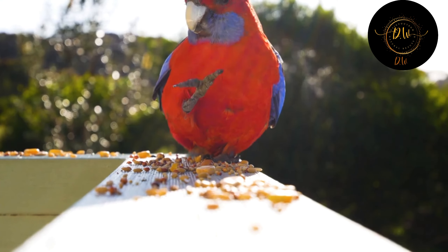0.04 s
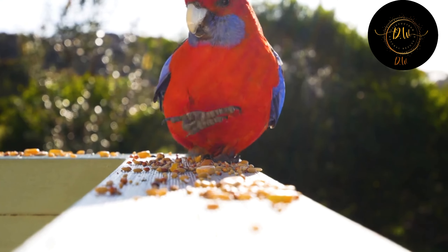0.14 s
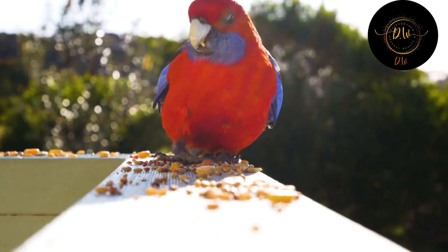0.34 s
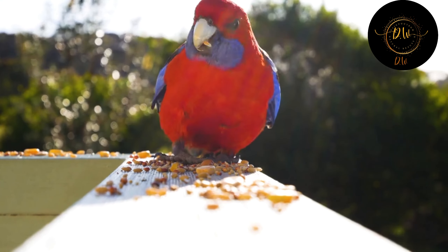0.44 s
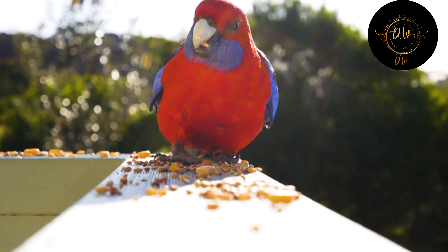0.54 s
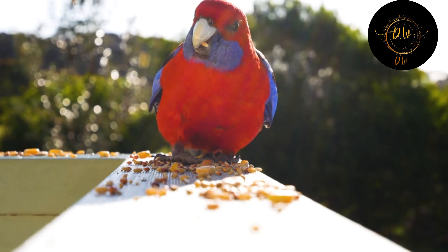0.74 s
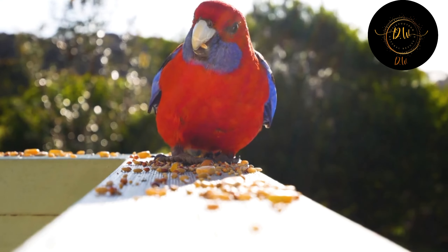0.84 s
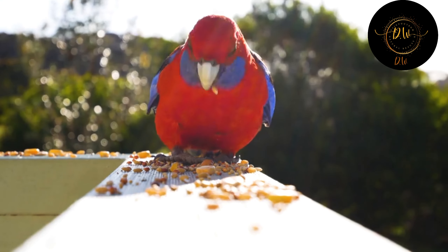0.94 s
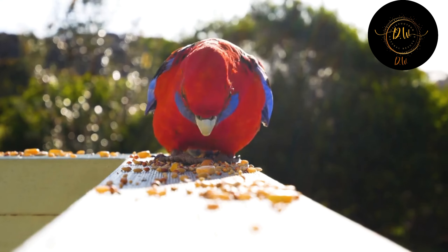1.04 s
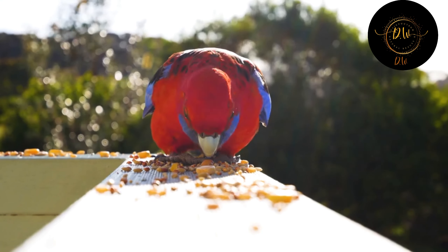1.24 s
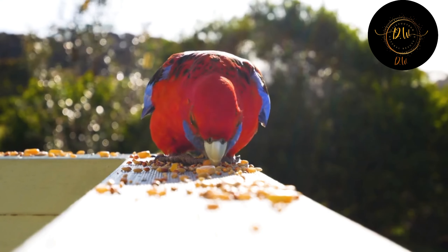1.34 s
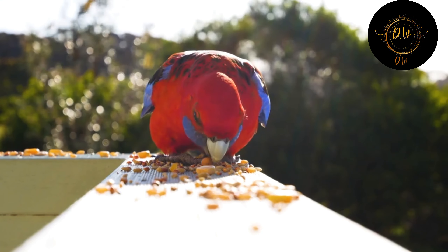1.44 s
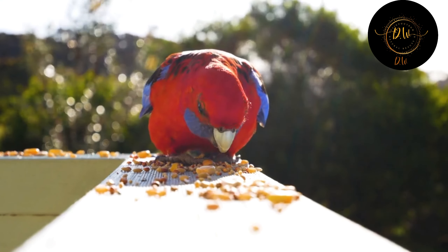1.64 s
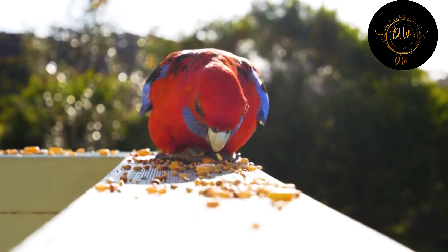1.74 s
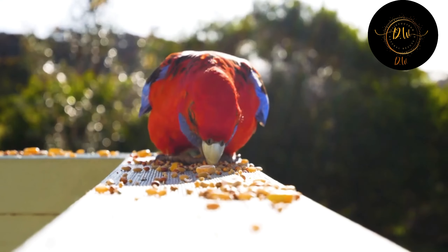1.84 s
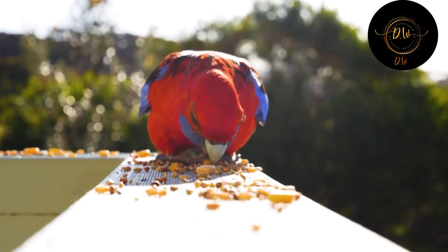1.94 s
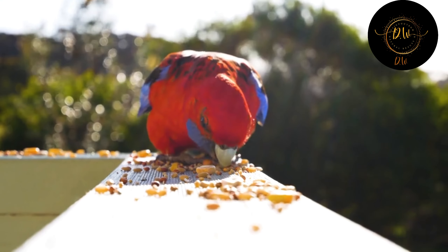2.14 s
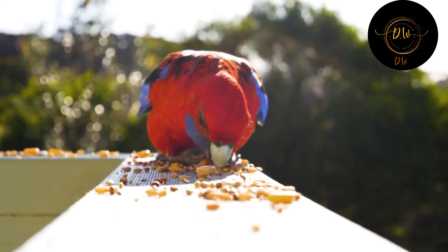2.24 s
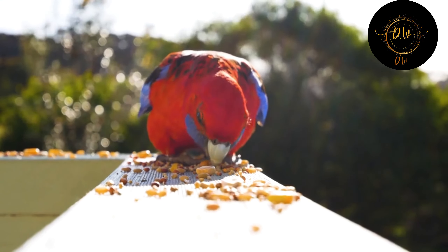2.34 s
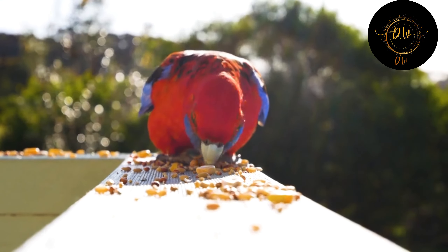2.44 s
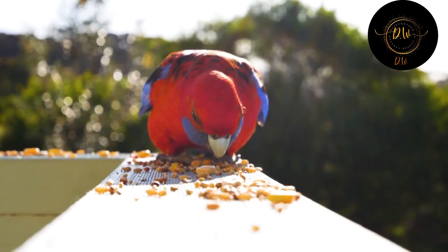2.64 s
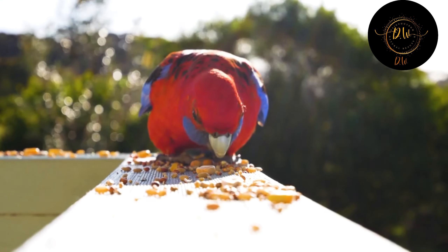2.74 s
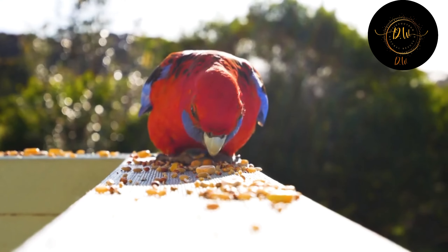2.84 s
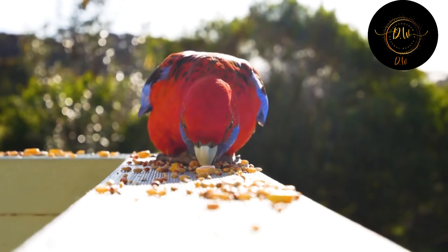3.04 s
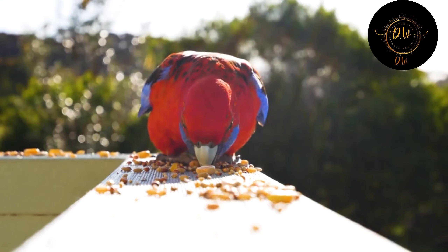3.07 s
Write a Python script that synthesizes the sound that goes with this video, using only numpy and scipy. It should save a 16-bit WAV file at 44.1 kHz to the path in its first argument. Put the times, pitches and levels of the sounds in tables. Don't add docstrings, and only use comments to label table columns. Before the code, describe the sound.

Close to the microphone, a parrot's beak drags and pecks through grain on a thin wooden rail. A strong scrape opens, near quiet follows, then irregular clusters of dry snaps, bright ticks and gritty crackle, with short pauses between bouts. The hardest cracks come near the end. Faint steady hiss and barely audible hum lie beneath; outdoors, dry, no echo.

```python
import sys
import numpy as np
from scipy import signal
from scipy.fft import rfft, irfft
from scipy.io import wavfile
from scipy.ndimage import uniform_filter1d

SR = 44100
rng = np.random.default_rng(int(sys.argv[2]) if len(sys.argv) > 2 else 0)


def level_to_linear(level):
    exponent = np.asarray(level, float) / 20
    return 10 ** exponent


def materialize(psi):
    bounded = np.clip(np.atleast_2d(psi).T, -1, 1)
    quanta = np.round(bounded * 32767).astype(np.int16)
    wavfile.write(sys.argv[1], SR, quanta)


N = 276948
TOP_HZ = 13900


def unit(x):
    return x / np.sqrt(np.mean(x ** 2))


def colour(x, points):
    hz, db = np.transpose(points)
    bin_hz = np.arange(1, 1026) * SR / 2050
    log_gain = np.log(level_to_linear(np.interp(np.log(bin_hz), np.log(hz), np.maximum(db, -50))))
    cepstrum = irfft(log_gain)
    cepstrum[1:1024] *= 2
    cepstrum[1025:] = 0
    return signal.fftconvolve(x, irfft(np.exp(rfft(cepstrum))))[:N]


def follow(points):
    return level_to_linear(np.interp(np.arange(N) / SR, *np.transpose(points)))


def swell(t, rise_s):
    return t / rise_s * np.exp(1 - t / rise_s)


def ring(x, modes):
    out = 0
    for k, (hz, db, t60_s) in enumerate(modes):
        pole = np.exp(2j * np.pi * hz / SR - np.log(1000) / (max(t60_s, .002) * SR))
        level = (-1) ** k * level_to_linear(db) * np.sqrt(1 - abs(pole))
        out = out + level * signal.lfilter([1], [1, -pole], x).imag
    return out


def slips(rate_hz, scatter_db, longest_db):
    when, size, sign = rng.random((3, N))
    height_db = np.minimum(-scatter_db * np.log(1 - size), longest_db)
    return unit((when < rate_hz / SR) * level_to_linear(height_db) * np.sign(sign - .5))


# freq [Hz], level [dB]
HUM = [(120, -70), (240, -76)]
# freq [Hz], density [dB per Hz]
HISS = [(100, -43), (200, -9.5), (300, -10), (480, -3.5), (2000, -9), (13500, -16.5), (14500, -37)]


def garden():
    t = np.arange(N) / SR
    hum = sum(level_to_linear(db) * np.sqrt(2) * np.sin(2 * np.pi * hz * t) for hz, db in HUM)
    low_pass = signal.butter(2, 65., fs=SR, output="sos")
    rumble = level_to_linear(-81) * unit(signal.sosfilt(low_pass, rng.standard_normal(N)))
    hiss = level_to_linear(-50.5) * unit(colour(rng.standard_normal(N), HISS))
    return hiss + rumble + hum


def ticks(rows, half_s, spread, gain_db):
    t = np.arange(-200, 200) / SR
    out = np.zeros(N + 400)
    shape = np.exp(-.5 * (t / half_s) ** 2)
    for (start_s, level_db, pitch_hz), chance in zip(rows, rng.standard_normal((len(rows), 2, 8))):
        partials_hz = np.minimum(pitch_hz * np.exp(spread * chance[0]), TOP_HZ)
        phase = np.pi * chance[1][:, None]
        burst = shape * np.sin(2 * np.pi * np.outer(partials_hz, t) + phase).sum(axis=0)
        burst *= np.linalg.norm(shape) / np.linalg.norm(burst) / np.sqrt(2)
        i = int(start_s * SR)
        out[i:i + 400] += level_to_linear(level_db + gain_db) * burst
    return out[200:N + 200]


# peak_s [s], level_db [dB], pitch_hz [Hz]
CHIPS = [(0.0451, -25, 10150), (0.0603, -19, 9050), (0.0664, -25, 8540), (0.0746, -22, 11400),
         (0.0805, -15, 8400), (0.0941, -34, 8690), (0.119, -24.5, 11040), (0.5726, -41, 9260),
         (0.6569, -35, 9900), (0.7735, -30, 9000), (1.1211, -35, 8820), (1.1286, -24.5, 9700),
         (1.1356, -25, 10240), (1.1497, -25.5, 9900), (1.2655, -31, 7450), (1.2982, -26, 9910),
         (1.3367, -25.5, 9700), (1.4288, -30.5, 9360), (1.4717, -33, 10470), (1.5603, -29, 7910),
         (1.5735, -28, 10680), (1.5868, -23, 10630), (1.5925, -20, 10100), (1.6261, -36, 10460),
         (1.6417, -31, 9100), (1.6508, -26, 7900), (1.6803, -37, 8030), (1.7181, -27, 9230),
         (1.7261, -35, 9990), (1.7361, -26, 11400), (1.7424, -31, 10620), (1.795, -32, 11660),
         (1.8265, -34, 9730), (1.8431, -23.5, 11500), (1.8544, -32, 8300), (1.8633, -34, 10850),
         (1.9202, -35, 9120), (1.927, -31.5, 8850), (1.9891, -32, 9980), (2.056, -34, 10400),
         (2.0755, -32, 10100), (2.0873, -32, 8500), (2.1193, -34, 10700), (2.1587, -35, 11500),
         (2.2127, -13, 9900), (2.2209, -18.5, 10940), (2.2356, -20, 9550), (2.2601, -35, 10100),
         (2.2925, -33, 9040), (2.2959, -31, 10930), (2.3488, -32, 7570), (2.3689, -39, 7540),
         (2.9592, -29, 8330), (2.9671, -23, 9800), (2.9753, -27, 11280), (2.995, -29, 10590),
               (3.0063, -18, 11300), (3.0177, -30, 9700), (3.0213, -38, 9560), (3.059, -39, 8600),
               (3.1902, -35, 10940), (3.1948, -35, 7950), (3.2002, -32.5, 10380), (3.2227, -30, 9470),
               (3.2796, -36, 9340), (3.3018, -22, 11360), (3.3188, -24, 10000), (3.3265, -20.5, 8440),
               (3.5324, -34, 10820), (3.6007, -31, 11210), (3.6088, -33, 11210), (3.6596, -18, 11380),
               (3.6787, -22, 9380), (3.6864, -23, 7760), (3.7773, -28.5, 11600), (3.8646, -34, 11730),
               (3.9066, -39.5, 10890), (3.9664, -32, 8940), (4.041, -21, 8900), (4.0497, -24, 10900),
               (4.0644, -28, 8100), (4.09, -33.5, 10250), (4.1642, -37, 10130), (4.2122, -32, 10400),
               (4.2186, -23, 11500), (4.227, -24, 10200), (4.2317, -25.5, 11100), (4.2469, -32, 10980),
               (4.3322, -36, 8940), (4.5116, -31, 10600), (4.6141, -26, 9700), (4.6628, -39, 12090),
               (4.7701, -27.5, 8630), (4.7961, -33, 8650), (5.0601, -26, 9400), (5.2143, -27.5, 10170),
               (5.2562, -31, 10640), (5.307, -33, 9430), (5.3351, -33, 7200), (5.3821, -31, 8650),
               (5.4075, -26, 11820), (5.5485, -33, 9830), (5.6277, -22, 10620), (5.6415, -19, 9500),
               (5.6485, -21, 8600), (5.6857, -27, 8270), (5.7048, -11, 10380), (5.7408, -35, 8260),
               (5.8605, -26.5, 10100), (6.2687, -35, 8600)]
# peak_s [s], level_db [dB], pitch_hz [Hz]
CRACKS = [(0.0449, -24, 3910), (0.0608, -25, 1870), (0.0805, -18.5, 4370), (0.1193, -32, 3120),
          (0.9247, -30.5, 3100), (1.1492, -22.5, 2720), (1.266, -27, 2900), (1.2986, -24, 2920),
          (1.427, -23.5, 2420), (1.4717, -30, 4660), (1.5603, -23, 4300), (1.5921, -20, 5150),
          (1.6417, -33, 3160), (1.651, -23, 4670), (1.6639, -27, 3000), (1.6803, -25, 2840),
          (1.795, -34, 2960), (1.8272, -30, 2500), (1.8431, -26, 3500), (2.0764, -23, 1810),
          (2.1193, -32, 4470), (2.2122, -17, 4430), (2.9376, -34, 3100), (2.9592, -20, 2070),
          (2.9676, -21, 3670), (2.9902, -24, 2000), (3.007, -24, 2570), (3.1907, -25.5, 1880),
          (3.1993, -24, 3400), (3.2902, -30, 3270), (3.3025, -25, 4650), (3.5324, -30, 2380),
          (3.6562, -26, 3150), (3.6594, -20, 3760), (3.6864, -17, 5150), (3.9068, -33, 1880),
          (3.9671, -27, 4600), (4.0408, -21, 4900), (4.0642, -27, 3450), (4.0921, -31, 4760),
          (4.1642, -31, 3250), (4.2125, -25, 2040), (4.2186, -23, 4370), (4.2313, -21.5, 4350),
          (4.6039, -28, 2040), (4.6143, -22, 4400), (4.7299, -26, 2840), (4.7698, -27, 3700),
          (5.0599, -18.5, 2660), (5.0646, -30, 2520), (5.2145, -27.5, 2170), (5.4018, -19, 2140),
          (5.5488, -27, 2300), (5.6408, -18, 4660), (5.6485, -22, 3260), (5.6855, -26, 5300),
          (5.6957, -16, 2590), (5.7048, -20, 2980), (5.7125, -23, 2420), (5.8605, -26.5, 2630)]


def shells():
    chips = ticks(CHIPS, half_s=0.00086, spread=0.205, gain_db=-1)
    cracks = ticks(CRACKS, half_s=0.00074, spread=0.32, gain_db=-1)
    return chips + cracks


# start_s [s], peak_db [dB], knock_db [dB], splinters_db [dB]
MAIZE = [(0.0436, -29, 9, 13), (.0789, -19, 14.5, 4), (.558, -20, -17, -25), (0.9304, -27, 10.5, -12),
         (1.1473, -11, -13, -10), (1.2445, -13, 0.5, -15), (1.5595, -20, 5, -1), (1.714, -15.5, 2, -4),
         (1.7404, -24.5, 18.5, 2), (1.7934, -19.5, 11, -9), (1.842, -17, 18, -2), (1.8541, -14, 16.5, -11),
         (1.8728, -14, 16, -12), (1.8941, -16, 12, -19), (2.0542, -43, -1, 16.5), (2.1174, -32, -7, -7),
         (2.2144, -15.5, -11, 18), (2.3442, -13, 1, -11), (2.9364, -21, -13, -16), (3.3006, -15.5, -7, 0),
         (4.6602, -28, 22, -11), (4.6719, -22, 18, -15), (5.253, -21, -4, -11), (5.6847, -16, 0, -2.5),
         (5.8583, -12, -16, -7)]
# start_s [s], peak_db [dB], knock_db [dB], splinters_db [dB]
LARGE_SEEDS = [(0.1158, -20, -9, 7), (0.656, -20.5, 6, -5.5), (0.6637, -21.5, 7.5, -18),
               (1.437, -25, 15, -23), (1.6487, -14, 3, -6), (1.988, -26.5, -18, 7), (2.0745, -12.5, 8, -13),
               (2.9578, -11, -20, -24), (3.0864, -36, -8, -10), (3.5318, -17.5, 3.5, -9),
               (3.6598, -18, 6, 4.5), (4.6144, -10, -30.5, -6), (4.7678, -15.5, -11, 1),
               (5.212, -13, -1, -8), (5.3984, -3.5, 0, -26), (5.5487, -14.5, -4, -9), (5.7124, -12, 0, -17)]
# start_s [s], peak_db [dB], knock_db [dB], splinters_db [dB]
WHEAT = [(0.925, -18.5, 5, -20), (1.1255, -13, -7, -3), (1.298, -22, 1, 1), (1.4255, -14.5, 5.5, -6),
         (1.4706, -25, 8, -1), (1.679, -22, -12, -10), (2.0854, -15, -7, -3), (2.965, -16, -21, -1),
         (2.989, -12, -6, -3), (3.004, -7, -2, 2), (3.021, -31, -8, -13), (3.189, -7.5, -1.5, -17),
         (3.1977, -19, -10, -7), (4.092, -29, -14, 9), (4.2122, -12, 3, -10), (4.2474, -33, -8, -6),
         (4.499, -21, 3, -13), (5.6483, -9, -5, -1), (5.7032, 0, 0, -1.5), (6.052, -27, 2, -7),
         (6.258, -27, -1, -5)]
# start_s [s], peak_db [dB], knock_db [dB], splinters_db [dB]
SMALL_SEEDS = [
    (1.826, -16.5, -5, -14),
    (4.164, -19, -12, -11),
    (4.2177, -21, 5, 10),
    (4.231, -12, -3, -0.5),
    (4.33, -19, -13, -4),
    (4.7297, -16.5, -19, -25),
    (5.0581, -5.5, -42, -17.5),
    (5.6398, -4, -13, -9),
]
# start_s [s], peak_db [dB], knock_db [dB], splinters_db [dB]
MILLET = [
    (1.335, -30, -19, 14),
    (1.5904, -7, -4, 0),
    (3.685, -1, -25, -9),
    (4.0384, -6, -23, 1),
    (4.7964, -26, -7, -2),
]
HUSK_HZ = [1170, 1630, 1820, 2750, 5030]
BEAK_HZ = [1715, 2420, 3150, 3940, 4820]


def snaps():
    t = np.arange(700) / SR
    out = np.zeros(N + 800)
    kinds = zip((MAIZE, LARGE_SEEDS, WHEAT, SMALL_SEEDS, MILLET), HUSK_HZ)
    husks = sorted((*row, hz) for rows, hz in kinds for row in rows)
    noise = rng.standard_normal((len(husks), 711))
    for (start_s, peak_db, knock_db, splinters_db, kind_hz), chance in zip(husks, noise):
        hz = kind_hz * (1 + .03 * chance[0])
        husk = -np.sin(2 * np.pi * hz * t) * (swell(t, .5 / hz) + .15 * swell(t, .0014))
        beak_hz = BEAK_HZ * (1 + 0.092 * chance[700:705])
        beak = chance[705:710] @ np.sin(2 * np.pi * np.outer(beak_hz, t)) * swell(t, .0007)
        splinters = (chance[2:702] - chance[:700]) * swell(t, .0008)
        debris = chance[699::-1] * swell(t, .003)
        knock_hz = 830 * (1 + 0.081 * chance[710])
        knock = -np.sin(2 * np.pi * knock_hz * t) * swell(t, 0.00084)
        snap = 0.29 * husk + 0.061 * beak + 0.043 * debris
        snap += 0.092 * level_to_linear(splinters_db) * splinters + 0.26 * level_to_linear(knock_db) * knock
        i = int((start_s + .0007) * SR)
        out[i:i + 700] += level_to_linear(peak_db) * snap
    return signal.sosfilt(signal.butter(2, 300., "high", fs=SR, output="sos"), out[:N])


# peak_s [s], rise_s [s], fall_s [s],
# rail_db [dB], deep_db [dB re rail]
STROKES = [(0.0, .01, 0.019, -18.5, -9), (0.061, 0.028, 0.035, -18, -18), (.115, 0.019, 0.091, -49.5, -10),
           (.3, 0.11, 0.066, -59.5, -17), (.43, 0.017, 0.11, -58.5, -4), (0.575, 0.03, 0.013, -45, -12),
           (.748, 0.034, 0.079, -33, -11.5), (1.034, 0.046, 0.036, -39, -12.5),
           (1.112, 0.058, 0.1, -33.5, -11), (1.178, 0.025, 0.038, -32, -5),
           (1.283, 0.072, 0.064, -32.5, -9.5), (1.436, 0.021, 0.088, -51, -1),
           (1.553, 0.023, 0.076, -27, -12), (1.648, .05, 0.052, -34.5, -7),
           (1.716, 0.021, 0.081, -30.5, -8), (1.855, 0.064, 0.06, -27.5, -2.5),
           (1.95, 0.22, 0.047, -35, -7), (2.146, 0.065, 0.029, -33, 1.5),
           (2.214, 0.027, 0.039, -21.5, -8.5), (2.289, 0.04, 0.018, -33, -5.5),
           (2.369, 0.08, 0.021, -37.5, -6),
           (2.96, 0.029, 0.042, -35, -12), (3.005, 0.023, 0.034, -16.5, -13.5),
                 (3.059, 0.028, 0.032, -37.5, -12), (3.124, 0.086, 0.074, -51.5, -18),
                 (3.248, 0.057, 0.077, -23, -5), (3.314, 0.038, 0.04, -23.5, -11),
                 (3.382, 0.02, 0.026, -36.5, -18), (3.592, 0.035, 0.034, -33.5, -3.5),
                 (3.664, 0.022, 0.057, -20.5, -12), (3.754, 0.039, 0.031, -26.5, -9),
                 (3.853, 0.061, 0.048, -31, -15), (3.959, 0.047, 0.039, -29, -6),
                 (4.041, 0.042, 0.043, -22, -12.5), (4.239, 0.046, 0.12, -39.5, -7),
                 (4.398, 0.029, 0.075, -32.5, -10), (4.509, 0.031, 0.033, -33.5, -5),
                 (4.592, 0.025, 0.065, -35, -5.5), (4.673, 0.025, 0.045, -26, -12.5),
                 (4.758, 0.054, 0.04, -34.5, -7),
           (5.094, 0.074, 0.039, -50.5, -20), (5.276, 0.08, 0.075, -25.5, -10),
                (5.345, 0.057, 0.051, -28.5, -3.5), (5.403, 0.098, 0.042, -20.5, -12.5),
                (5.59, 0.044, 0.069, -30.5, -6), (5.632, 0.07, 0.038, -20, -4),
                (5.708, 0.036, 0.039, -19.5, -26), (5.75, 0.018, 0.078, -58, 6),
                (5.884, 0.034, 0.0089, -49, -2.5), (5.98, 0.08, 0.028, -46.5, -12),
                (6.067, 0.032, 0.017, -33, -5), (6.185, 0.087, 0.038, -40, -9),
                (6.264, 0.033, 0.1, -30.5, -9),
           (.15, .02, .04, -55, -8), (.86, 0.044, 0.11, -52.5, -6), (1.065, .03, .03, -50, 0),
           (1.385, 0.08, 0.096, -55, -14), (2.43, 0.021, 0.036, -51, -12), (2.475, .025, 0.051, -57, -6),
           (3.43, 0.05, 0.055, -59, -8), (4.112, 0.024, 0.018, -41, -4), (4.31, .04, 0.044, -40.5, -10.5),
           (4.849, 0.029, 0.017, -48.5, -7), (4.943, 0.017, 0.014, -56, -4),
           (5.434, 0.036, 0.012, -28, -21), (5.95, 0.022, 0.033, -53, 4), (5.2, 0.058, .02, -50, -12),
           (2.235, .015, 0.036, -33.5, -8), (4.022, .02, .02, -30, -10), (5.692, 0.014, .02, -22, -16)]


def effort():
    drop_db = 25
    rail_curve, grit_curve = 1.44, 1.85
    pivot_db, grit_law = -41, 0.54
    t, gains = np.arange(N) / SR, np.zeros((3, N))
    for peak_s, rise_s, fall_s, rail_db, deep_db in STROKES:
        near = slice(max(int((peak_s - 4 * rise_s) * SR), 0), int((peak_s + 4 * fall_s) * SR))
        after = t[near] > peak_s
        away = np.abs(t[near] - peak_s) / np.where(after, fall_s, rise_s)
        rail_loss_db = drop_db * away ** rail_curve
        deep_loss_db = np.where(after, .65, 0.85) * rail_loss_db
        grit_loss_db = np.where(after, 0.51, 0.99) * drop_db * away ** grit_curve
        grit_db = pivot_db + grit_law * (rail_db - pivot_db)
        now = level_to_linear(np.array([rail_db - rail_loss_db, rail_db + deep_db - deep_loss_db,
                            grit_db - grit_loss_db]))
        gains[:, near] = np.maximum(gains[:, near], now)
    return gains


# freq [Hz], density [dB per Hz]
GRIT = [(710, -22.5), (1200, 2), (1510, -6.5), (1840, 0), (2090, -5.5), (3400, -6.5), (7210, -11),
        (11800, -9.5), (13800, -18.5), (14500, -18)]


def grit(kicks):
    out, edges_hz = 0, np.geomspace(1200, 15000, 8)
    burst = np.hanning(90)
    for lo_hz, hi_hz in zip(edges_hz, edges_hz[1:]):
        own = slips(rate_hz=160., scatter_db=4.5, longest_db=15)
        hits = np.abs(kicks) + 0.23 * np.abs(own)
        gate = unit(signal.fftconvolve(hits, burst)[:N]) + 1.1
        patch = level_to_linear(2.5 * unit(uniform_filter1d(rng.standard_normal(N), size=1500)))
        band = signal.butter(2, [lo_hz, hi_hz], "band", fs=SR, output="sos")
        out = out + signal.sosfilt(band, patch * gate * rng.standard_normal(N))
    return unit(colour(out, GRIT))


# freq [Hz], level [dB], t60 [s]
DEEP_MODES = [(213.5, -15, 0.15), (239, -12.5, 0.13), (303.8, -1, 0.11), (395.3, -1, 0.069)]
# freq [Hz], level [dB], t60 [s]
RAIL_MODES = [(491, -7, 0.021), (546.5, 0, 0.038), (614, 1, 0.024), (719, 5, 0.022), (754, -5.5, 0.01)]
# freq [Hz], level [dB], t60 [s]
UPPER_MODES = [(914, 11, 0.02), (1112, 6, 0.03), (1315, -0.5, 0.0058), (1890, -10, 0.011),
               (2710, -39, 0.0016)]
# time [s], gain [dB]
SPOT = [(0, -0.5), (.6, -2.5), (1.2, -2), (1.8, 1), (2.3, -2.5), (3, -7.5), (3.8, -8.5), (4.5, -4.5),
        (5.3, -8.5), (5.62, -11), (5.72, -6.5), (6.28, -4.5)]
# time [s], grit gain [dB]
LITTER = [(0, 2.5), (.5, 1.5), (1, -6), (1.3, 1), (1.6, 1), (1.9, 0), (2.2, 3.5), (2.4, -2.5), (3, 0.5),
          (3.35, 0.5), (3.76, -1), (3.85, -5.5), (3.94, 1.5), (4.1, -2), (4.8, -1.5), (5.35, -2),
          (5.7, -0.5), (6.28, -1)]


def scrape():
    rail, deep, crackle = effort()
    kicks = slips(rate_hz=1200, scatter_db=4.5, longest_db=12)
    layers = ((level_to_linear(0.5) * rail, RAIL_MODES), (follow(SPOT) * rail, UPPER_MODES),
              (level_to_linear(2.0) * deep, DEEP_MODES))
    wood = 0
    for gain, modes in layers:
        wood = wood + ring(gain * kicks, modes) / np.std(ring(kicks, modes))
    shake = signal.butter(2, 82, fs=SR, output="sos")
    thud = signal.sosfilt(shake, deep * kicks) / np.std(signal.sosfilt(shake, kicks))
    return wood + level_to_linear(0.5) * follow(LITTER) * crackle * grit(kicks), level_to_linear(-27) * thud


def scene():
    rail, thud = scrape()
    thin_rail = signal.butter(1, 130., "high", fs=SR, output="sos")
    bird = signal.sosfilt(thin_rail, rail + snaps()) + thud
    air = garden()
    return np.tile(bird + shells() + air, (2, 1))


# freq [Hz], level [dB re mid]
WIDE = [(100, 0), (200, -9), (500, -16), (2500, -12), (6000, -5), (12000, 2)]


def thin_out(x, margin_db, drop_chance, split_chance):
    hz, t, spec = signal.stft(x[0], SR, nperseg=2048)
    side = spec * np.exp(2j * np.pi * rng.random(spec.shape))
    wide_hz, wide_db = np.transpose(WIDE)
    side *= level_to_linear(np.interp(np.log(hz + 1), np.log(wide_hz), wide_db))[:, None]

    def luck():
        return uniform_filter1d(rng.standard_normal(len(t)), size=2) * np.sqrt(2)

    frame_luck = luck()
    for lo_hz in np.arange(0, 15000, 600):
        rows = (hz >= lo_hz) & (hz < lo_hz + 600)
        power = np.mean(np.abs(spec[rows]) ** 2, axis=0)
        usual = uniform_filter1d(power, size=15)
        weak = (power < level_to_linear(-margin_db) ** 2 * usual) & (lo_hz > 8500)
        spec[rows] *= np.where(weak & (luck() > drop_chance), .03, 1)
        side[rows] *= frame_luck + luck() > split_chance
    side[hz >= 15000] = 0
    return signal.istft(np.array([spec + side, spec - side]), SR, nperseg=2048)[1][:, :N]


def top_cut(x):
    return signal.sosfilt(signal.butter(12, 14970, fs=SR, output="sos"), x)


def record(dry):
    steep = signal.ellip(8, .2, 40, TOP_HZ, fs=SR, output="sos")
    mix = signal.sosfilt(steep, dry)
    mix = thin_out(mix, margin_db=2, drop_chance=1.1, split_chance=1.1)
    return top_cut(mix)


dry = scene()
out = record(dry)
materialize(out)
```